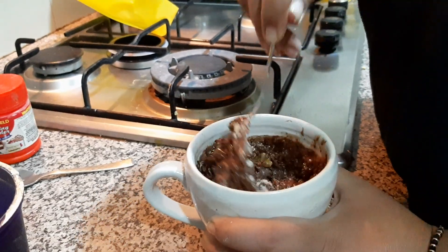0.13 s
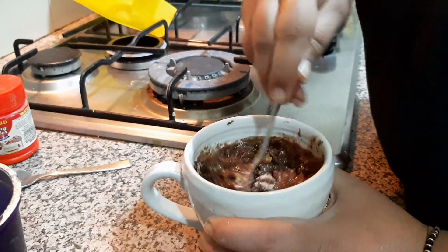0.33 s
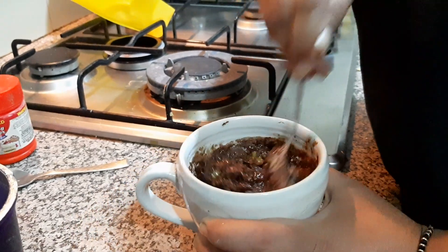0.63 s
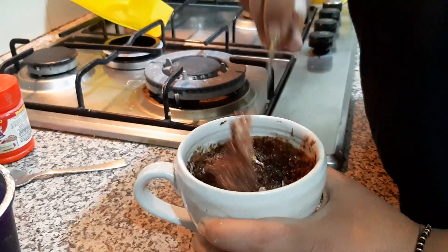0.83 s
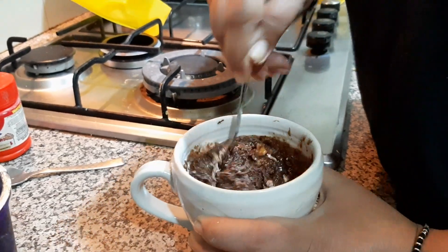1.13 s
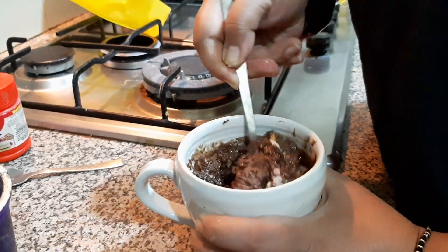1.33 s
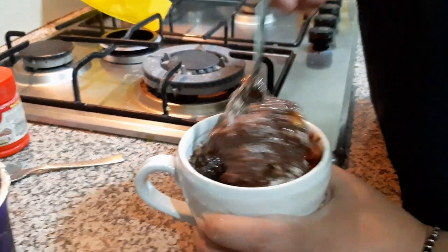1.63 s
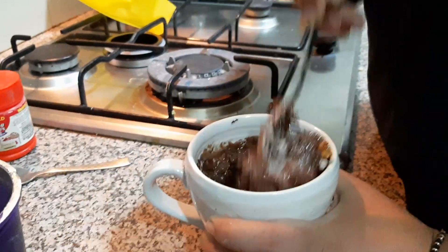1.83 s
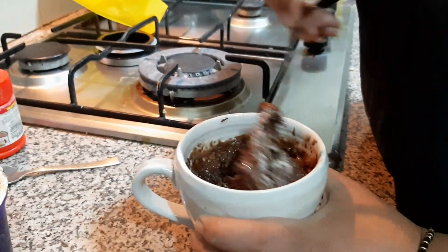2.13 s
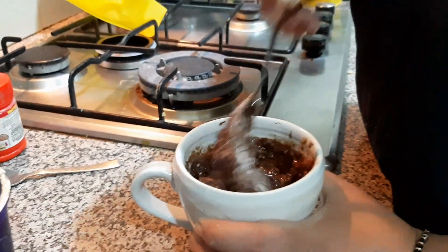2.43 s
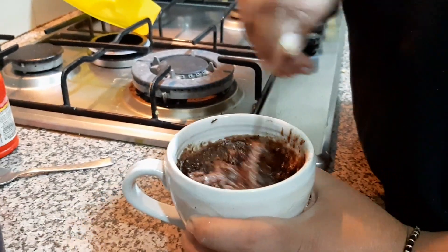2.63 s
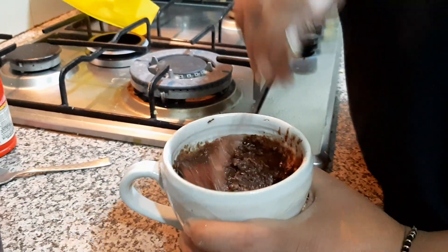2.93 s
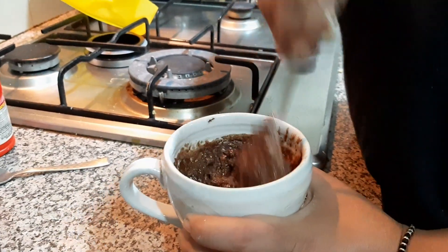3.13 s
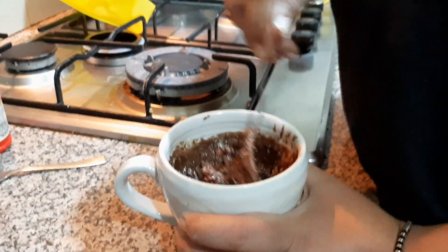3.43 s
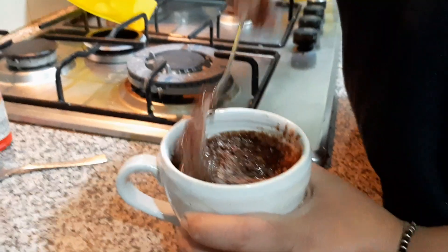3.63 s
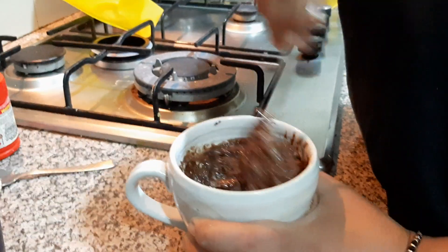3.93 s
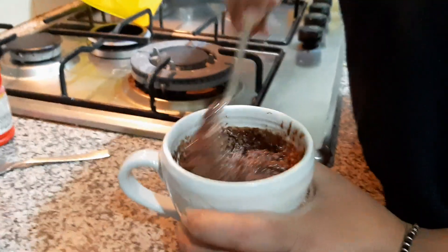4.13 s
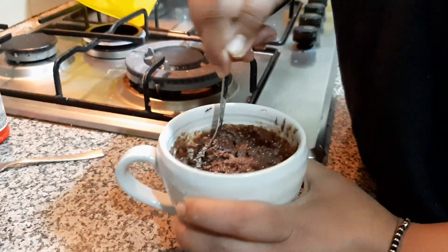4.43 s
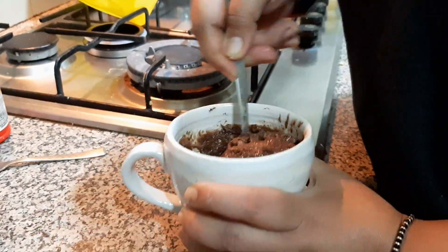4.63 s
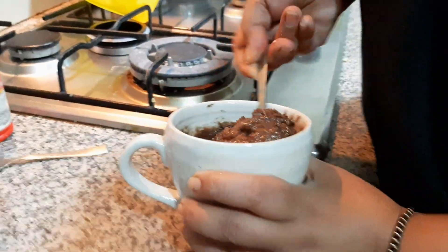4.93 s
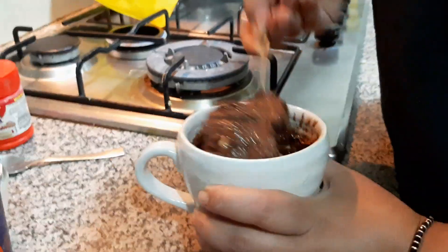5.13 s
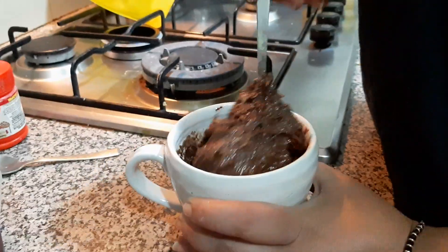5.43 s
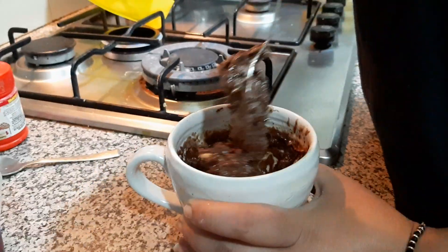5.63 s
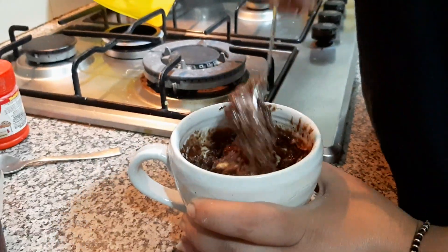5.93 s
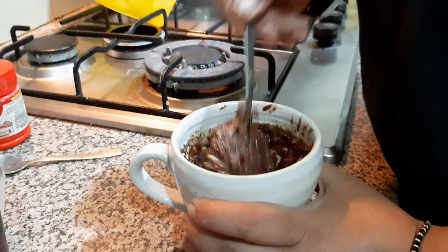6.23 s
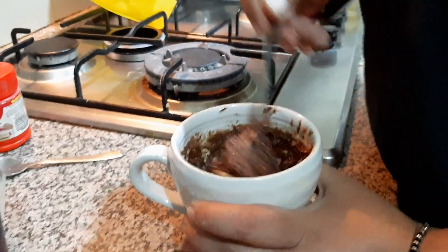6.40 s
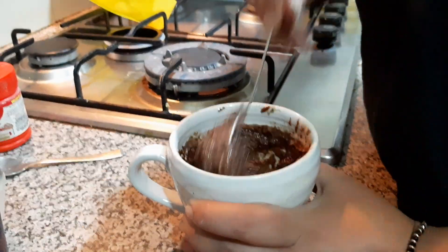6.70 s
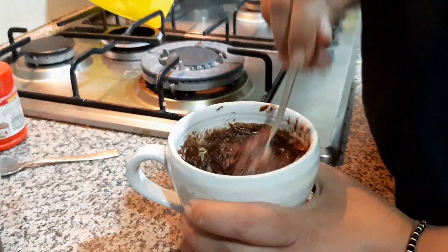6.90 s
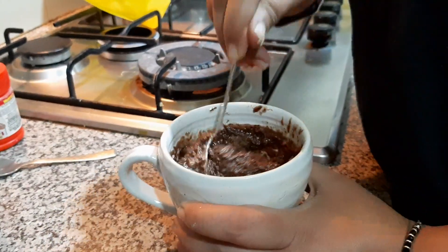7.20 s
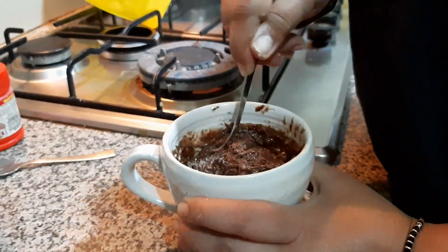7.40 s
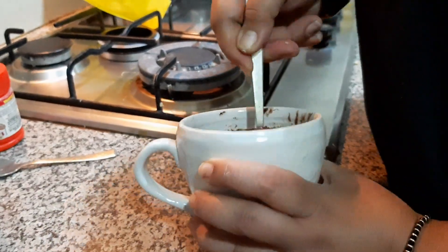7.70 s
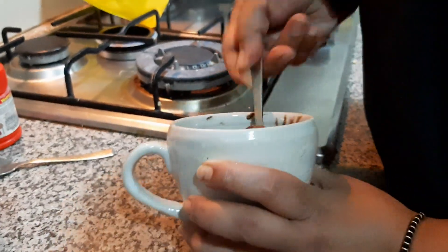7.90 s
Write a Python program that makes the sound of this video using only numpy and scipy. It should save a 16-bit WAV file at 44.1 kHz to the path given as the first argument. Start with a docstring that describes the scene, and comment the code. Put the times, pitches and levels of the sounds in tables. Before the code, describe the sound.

A metal spoon stirs thick batter in a ceramic mug, close to the microphone in a small kitchen. Short, damped clinks and hollow knocks come at uneven intervals, mixed with brief scrapes and the soft, wet smacking of the mixture. The knocks grow stronger around the middle, ease off while the sticky stirring continues, then bunch into a quick clatter near the end. A faint low hum lies underneath.

```python
"""A small, hard kitchen, with a stereo microphone close to a ceramic mug held on a stone worktop.
A metal spoon stirs thick batter: its knocks and stick-slip scrapes ring the mug and pop its hollow.
The batter smacks and crackles as sticky pockets burst, and swishes once as the spoon drags air through.
Near echoes and a short room tail answer, over the quiet hum of the kitchen."""
import sys
import numpy as np
from scipy import signal
from scipy.fft import rfft, irfft, next_fast_len
from scipy.io import wavfile

SR = 44100
rng = np.random.default_rng(int(sys.argv[2]) if len(sys.argv) > 2 else 0)


def waveform_to_disk(signal):
    """Save audio, clipped to [-1, 1], as 16-bit WAV at the path in sys.argv[1]."""
    frames = np.transpose(np.atleast_2d(signal))
    scaled = np.clip(frames, -1, 1) * 32767
    samples = np.round(scaled).astype(np.int16)
    wavfile.write(sys.argv[1], SR, samples)


N = 355357

# The spoon meets the mug. Each row: start in seconds, thud level in dB, then thump, wall ring and clink
# in dB relative to the thud, contact time in ms, then the favoured thud, wall and clink pitches in Hz.
SPOON_KNOCKS = [(0.152, -45.5, 7, 9.5, 7, 1.7, 580, 2800, 4170),
                (.164, -27, -20, -47, -35, 4.4, 933, 1730, 4140),
                (0.335, -45, -1, -2, 11, 2, 986.8, 3100, 5140),
                (.366, -37, -11, -11, -8, 5.2, 1010, 3060, 4400),
                (.573, -45.5, -22, -37, -8, 3.1, 1050, 2340, 4190),
                (.674, -28, -14, 6.5, 1.5, 18.6, 1053, 2480, 4000),
                (0.853, -15.5, -13, -11.5, -33, 5.1, 1023, 1400, 3840),
                (1.198, -30.5, -5, -9, -26.5, 13, 1060, 1440, 4560),
                (1.235, -28.5, -6, -15, -24, 3.627, 1100, 1480, 4540),
                (1.307, -30.5, -15, -2, -2, 3.2, 1190, 1631, 5110),
                (1.4, -37.5, -29.5, -1.5, 5, 5, 990, 2820, 4900),
                (1.91, -53.5, -23, -21, -15, 3.914, 1108, 1800, 4400),
                (2.483, -35.5, -10, -15, -30.5, 3, 1018, 1839, 5180),
                (2.572, -37.5, -15.5, 11, 16.5, 3.4, 1043, 2100, 5870),
                (2.6, -34.5, -34, 8.5, -1, 6, 1200, 2360, 5670),
                (2.764, -30.5, -11.5, -15, -12, 1.4, 1046, 1780, 5860),
                (2.981, -30.5, -21, -6, 5, 3.2, 800, 2135, 5500),
                (3.044, -6.5, -11, -1, -15.5, 7.3, 1112, 1796, 4450),
                (3.328, -28.5, -18, -14.5, -27, 1.4, 993, 1880, 3680),
                (4.177, -10.5, -7.5, -5, -20, 31, 1110, 1797, 4300),
                (4.309, -17.5, -9, -13.5, -44.5, 7.7, 1030, 1760, 4100),
                (4.513, -34, 2.5, -6, -5, 3.7, 613, 2140, 5170),
                (4.589, -28.5, -6, 8, 1, 6.4, 1110, 2970, 3670),
                (4.641, -14, -14, -4, 6.5, 2.35, 1126, 2020, 4440),
                (4.71, -20, -16, -5.5, 0, 4.4, 1190, 2010, 4700),
                (4.876, -29, -25, 9.5, 6, 5.7, 980, 2800, 4400),
                (4.899, -26.5, -15, 5, 10, 12, 926, 2100, 4500),
                (4.926, -39, -14, 2, 22, 1.3, 840, 1970, 4500),
                (5.368, -36, -22, -25, -40, 9.8, 1030, 1800, 4000),
                (5.384, -18.5, -18, -10, -40, 6.3, 1020, 1400, 3890),
                (6.13, -37, -9, 1.5, -1, 11, 592, 2060, 5160),
                (6.152, -26, -41, -2.5, -12.5, 5.3, 1135, 2125, 5193),
                (6.822, -28.5, -6.5, 1.5, 1, 6.2, 803, 2254, 5436),
                (6.99, -38, -7, -13, -7, 8.5, 604, 2872, 4700),
                (7.156, -48, -0.5, -27, -24, 3.7, 1049, 1790, 4375),
                (7.381, -41, -14, -3.5, -6, 6.2, 540, 2100, 5200),
                (7.405, -33.5, -18, -14, -22, 4.5, 1115, 2100, 4090),
                (7.521, -37, -14, -22, -10, 2.3, 1067, 1780, 4537),
                (7.493, -39.5, -5, -20, -20, 3, 640, 2100, 4600),
                (7.542, -33.5, -7, -16, -14, 2.3, 733, 1880, 4600),
                (7.606, -34.5, -1, -5, -16, 4.7, 704, 1710, 4750),
                (7.691, -28, -28, 2, -2, 7.4, 1134, 2010, 5120),
                (7.727, -20, -21, -18, -1, 3.2, 933, 2130, 4626),
                (7.769, -16.5, -31, -9.5, -5.5, 3.1, 931, 1870, 4230),
                (7.78, -27, -11, -2, -9, 3.4, 996, 1880, 4150),
                (7.792, -27, 3.5, -4, -12, 2.5, 960, 1874, 3980),
                (7.818, -43, 6, -9, 0, 3.8, 945, 1890, 4400),
                (7.875, -29.5, -17, -10.5, -15, 2.875, 930, 2109, 4400),
                (7.9, -31, -9, -19, -15, 6.8, 934, 2100, 4460),
                (7.974, -30.5, -14, 1.5, -4, 3.4, 870, 2100, 4540),
                (8.017, -32, -5, 10, 17.5, 2.45, 840, 2060, 5010)]
# The spoon slides along the wall. Each row: start and length in seconds, growth over the length in dB,
# closing levels of thud, thump, wall ring, clink and hollow in dB, starting pitch of the hollow in Hz.
SPOON_SCRAPES = [(.365, 0.24, -4.5, -62.5, -67, -70, -69, -71, 1030),
                 (1.17, 0.13, 9.5, -42.5, -47.5, -50.5, -54, -50, 1155),
                 (2.995, 0.04, 2.5, -42, -42.5, -45, -68, -59, 979.1),
                 (4.46, 0.17, 3, -51, -49, -62, -57, -54, 1044),
                 (4.668, 0.12, -1, -50, -50, -67, -67, -45, 1070),
                 (4.8, 0.099, 11.5, -37, -48.5, -35, -40.5, -33, 938),
                 (4.97, 0.083, -2, -58.5, -58.5, -69, -57.5, -60, 857),
                 (5.31, 0.084, 8, -53, -50, -66, -62, -68.5, 1047),
                 (6.132, 0.057, -2.5, -70, -61.5, -65, -59, -64, 1090),
                 (7.384, 0.054, -4, -66, -56.5, -67, -70, -69, 1107),
                 (7.49, 0.12, 7, -49, -47.5, -53.5, -59, -68, 1040),
                 (7.651, 0.063, 0, -53.5, -48.5, -50, -55, -49, 1097),
                 (7.745, 0.14, -4.5, -49.5, -49, -54, -54, -40.5, 968),
                 (7.9, 0.094, 3.5, -50, -58, -47, -55, -42.5, 927)]
# Mug and spoon, damped by batter and hand. Each row: pitch in Hz, gain in dB, t60 in seconds.
MUG_MODES = [(230, -7, 0.013), (356, 22.5, 0.032), (484.28, 3.5, 0.059), (629, -2, 0.049), (790, -3, 0.046),
             (980, 15, 0.0073), (1030, 2, 0.019), (1147, 6.5, 0.015), (1560, -17.5, 0.066),
             (1850, 3, 0.022), (2106, 10.5, 0.019), (2386, 6.5, 0.02), (2610, 4, 0.035), (2803, 6.5, 0.027),
             (3140, 0, 0.024), (4100, -15, 0.018), (4244, -11, 0.028), (4490, -10, 0.025),
             (4630, -10.5, 0.011), (5135, 3, 0.0074), (5870, -2, 0.0067), (6795.8, -1.5, 0.0048),
             (7340, -3.5, 0.01), (9000, -10.5, 0.0026), (10580, -14.5, 0.0028)]
# The mode families thud, thump, wall ring and clink. Each row: lower and upper edge in Hz.
FAMILY_EDGES = [(500, 1400), (215, 500), (1400, 3500), (3500, 14000)]
# The three tones of the hollow's pop. Each row: ratio to the thud pitch, level in dB.
HOLLOW_TONES = [(.66, -7), (1.002, 1), (1.2, -6.5)]
# The batter lets go with a smack. Each row: start in seconds, level in dB, centre pitch in Hz.
BATTER_SMACKS = [(0.0301, -23.5, 6570), (0.0757, -22, 9800), (0.088, -25, 4180), (0.128, -30, 4440),
                 (0.29, -41.5, 4700), (0.336, -25.5, 3300), (0.4842, -34, 3040), (0.788, -37, 3120),
                 (.8447, -34, 2280), (0.954, -33.5, 4540), (1.1207, -26.5, 4440), (1.148, -28.5, 2365),
                 (1.3704, -29.5, 4250), (1.4615, -28.5, 4800), (1.652, -43, 7000), (1.6924, -41.5, 8200),
                 (1.821, -44, 4900), (1.845, -54, 4480), (1.9077, -38, 7400), (1.919, -38, 4040),
                 (1.942, -32, 5570), (1.957, -26.5, 5750), (1.9862, -35, 5650), (2.055, -30, 6130),
                 (2.073, -36.5, 5630), (2.107, -36, 7700), (2.2022, -45, 8050), (2.2672, -32, 6300),
                 (2.338, -44, 5300), (2.36, -25.5, 4040), (2.4218, -29.5, 5660), (2.439, -33, 5630),
                 (2.461, -29.5, 6900), (3.387, -36.5, 6900), (3.4313, -39, 6170), (3.436, -40, 7130),
                 (3.4628, -39, 7480), (3.542, -45.5, 2101), (3.6773, -49, 4890), (3.693, -40, 7100),
                 (3.7781, -35.5, 7400), (3.795, -36, 5140), (3.807, -29.5, 7060), (3.813, -41.5, 4800),
                 (3.82, -37.5, 7420), (3.855, -42, 5070), (3.9172, -33, 6675), (3.9409, -34, 7000),
                 (4.048, -36.5, 5500), (4.103, -32, 4700), (4.1178, -38, 4430), (4.354, -29.5, 4650),
                 (4.374, -36, 4370), (4.569, -27, 2840), (5.3402, -39, 4160), (5.55, -36, 4760),
                 (5.942, -39, 4730), (5.9595, -45.5, 4430), (6.186, -37, 4060), (6.265, -53, 2776),
                 (6.2925, -34, 6093), (6.3031, -23.5, 5500), (6.324, -38, 4800), (6.3887, -43.5, 5670),
                 (6.4312, -33, 5690), (6.5124, -36.5, 6060), (6.589, -27.5, 6320), (6.967, -37.5, 5450),
                 (7.004, -34.5, 3680), (7.069, -47, 4930), (7.204, -39, 7800)]
# Each fold of the batter crackles wetly. Each row: start and length in seconds, level in dB,
# pocket pitch in Hz, level of the treble fizz in dB.
BATTER_FOLDS = [(0, 0.021, -61, 7140, -81), (0.079, .07, -59, 4270, -58),
                (0.431, 0.089, -59.5, 4750, -65.5), (0.701, 0.22, -60, 4180, -68.5),
                (0.998, 0.09, -63, 4460, -83), (1.19, 0.16, -51.5, 5250, -65),
                (1.459, 0.074, -56, 4700, -62), (1.646, 0.078, -69, 5600, -68),
                (1.838, 0.18, -64, 5300, -82), (2.037, 0.077, -64, 5800, -64.5),
                (2.279, 0.18, -63, 5430, -63.5), (2.59, 0.17, -62, 5150, -64),
                (3.039, 0.081, -48, 4245, -58), (3.198, 0.027, -59.5, 4660, -63),
                (3.377, 0.086, -64, 6200, -75), (3.526, 0.037, -68, 5000, -69.5),
                (3.798, .08, -58, 6980, -61.5), (3.92, 0.21, -64.5, 4525, -67.5),
                (4.204, 0.22, -59, 4580, -70), (4.547, 0.18, -51, 4650, -59.5),
                (4.843, 0.073, -42.5, 4440, -58), (5.031, .3, -61, 4500, -72),
                (5.481, 0.096, -62.5, 5030, -71.5), (5.821, 0.033, -65.5, 4900, -77),
                (5.951, 0.09, -63, 4630, -68.5), (6.143, 0.036, -63.5, 4800, -66),
                (6.289, 0.05893, -61.5, 5380, -60.5), (6.426, 0.05, -67, 5170, -71),
                (6.587, .08, -66.5, 5850, -62.5), (6.756, .14, -63, 5080, -81.5),
                (6.966, 0.085, -58, 4770, -61.5), (7.371, .06, -67, 4680, -82.5),
                (7.555, 0.086, -55, 5420, -78), (7.695, 0.12, -54.5, 4337, -67),
                (7.939, 0.072, -51.5, 4980, -73)]
# The colour of the crackle. Each row: frequency in Hz, gain in dB.
CRACKLE_SPECTRUM = [(1180, -21.5), (2000, -5), (2730, -0.5), (3270, -7), (3700, 1), (5990, 1), (10000, -21),
                    (13000, -23), (22000, -120)]
# The course of the falling swish. Each row: time in seconds, level in dB, pitch in Hz.
SWISH_PATH = [(0.369, -66, 2940), (.42, -47.5, 2740), (.52, -68.5, 2500), (.67, -53.5, 2450)]
# Direct sound at the microphone. Each row: frequency in Hz, lag of right behind left in radians.
RIGHT_LAG = [(100, 1), (500, 0.07), (1100, 1.4), (2200, 6), (4000, 5.2), (16000, 9.7)]
# The colour of the near echoes. Each row: frequency in Hz, gain in dB.
ECHO_SPECTRUM = [(200, -18), (700, -13.5), (1300, -2), (2500, 0.5), (6000, 0.5), (16000, 3.5)]
# The room's decay. Each row: frequency in Hz, t60 in seconds before the tail's extra damping.
ROOM_DECAY = [(150, 0.46), (500, 0.45), (1200, 0.49), (2500, 0.47), (5000, 0.27), (12000, 0.15)]
# The diffuse field at the microphone. Each row: frequency in Hz, left-right likeness from 0 to 1.
STEREO_LIKENESS = [(60, 0.82), (300, 0.96), (640, 0.65), (1400, 0.13), (16000, 0.078)]
# The colour of the kitchen's hum. Each row: frequency in Hz, relative level in dB.
HUM_SPECTRUM = [(20, -39.5), (40, -52), (65, 9), (100, -10), (250, -3.5), (450, -9), (700, -14.5),
                (1100, -19.5), (1700, -30), (3000, -33), (5000, -24.5), (8000, -31.5), (16000, -39.5)]


def knocks():
    """The spoon chatters briefly on the mug. Returns the ring of the wall and the pop of the hollow."""
    rise_ms, slump_ms = 2, 16.4
    pop_ms, pop_sag_hz_per_s = 12.7, 6800
    bump_hz, bump_db, bump_t60 = 125, -31.5, .15  # the worktop takes the blow
    wall, hollow = np.zeros((2, N))
    t = np.arange(4000) / SR
    ms = 1000 * t
    stilling = np.exp(-(ms / slump_ms) ** 2)  # the batter slumps back and stills the wall
    for start, thud_db, thump_db, wall_db, clink_db, contact_ms, *spot_hz in SPOON_KNOCKS:
        age = ms / max(contact_ms, .5)
        force = flatten(rng.standard_normal(len(t)) * np.exp(-age), share=0.84)
        force *= np.minimum(ms / rise_ms + 0.13, 1) * np.exp(-(age / 3.9) ** 2)
        # each spot on the mug favours the modes near its three pitches
        spot_db = lambda hz: 12 * np.exp(-(np.log(hz / np.array(spot_hz)) / 0.054) ** 2).max()
        for edges_hz, db in zip(FAMILY_EDGES, (0, thump_db, wall_db, clink_db)):
            dulling = np.exp(-age * edges_hz[0] / 61000)  # higher families are driven more briefly
            ring = mug_ring(force * dulling, edges_hz, spot_db)
            add(wall, start, gain_of(thud_db + db) * ring / abs(ring).max() * stilling)
        cycles = np.cumsum(spot_hz[0] - pop_sag_hz_per_s * (ms - pop_ms / 2) / 1000) / SR
        tones = sum(gain_of(db) * np.sin(2 * np.pi * (ratio * cycles + rng.random()))
                    for ratio, db in HOLLOW_TONES)
        pop = 0.3132 * tones * np.minimum(ms / 2.6, 1) * np.exp(-(ms / pop_ms) ** 4)
        pop_db = thud_db - 0.27 * np.clip(wall_db + 5.5, -14, 14)  # a duller contact pops more
        bump = gain_of(thud_db + bump_db - 60 * t / bump_t60) * np.sin(2 * np.pi * bump_hz * t)
        add(hollow, start, gain_of(pop_db) * pop + bump)
    return wall, hollow


def scrapes():
    """The spoon edge sticks and slips over the glaze: clumps of clicks ring the mug and its hollow."""
    sag_hz_per_s = 300
    out = np.zeros(N)
    for start, length, growth_db, *levels_db, start_hz in SPOON_SCRAPES:
        t = np.arange(start - .05, start + length + .15, 1 / SR)
        slips_db = 5.5 * unit_rms(mode(rng.standard_normal(len(t)), hz=60.4, t60=0.04))
        clicks = grit(len(t), per_s=2500, spread_db=3.5)
        force = clicks * gain_of(np.clip(slips_db, -14, 8))
        rings = [mug_ring(force, edges, lambda hz: 2.1 * rng.standard_normal()) for edges in FAMILY_EDGES]
        hollow_hz = start_hz - sag_hz_per_s * (t - start)
        rings.append(gliding_mode(gliding_mode(clicks, hollow_hz, t60=0.045), hollow_hz, t60=0.015))
        sound = sum(gain_of(db) * unit_rms(ring) for db, ring in zip(levels_db, rings))
        ramp_db = growth_db * (np.clip((t - start) / length, 0, 1) - 1)
        fade_db = swell_db(t, start, length, rise_db_per_s=897, fall_db_per_s=306)
        add(out, t[0], sound * gain_of(ramp_db + fade_db))
    return out


def mug_ring(force, edges_hz, spot_db):
    """A force rings one family of modes; spot_db(Hz) says how well the struck spot reaches each."""
    low, high = edges_hz
    ring = sum(gain_of(db + spot_db(hz)) * mode(force, hz, t60)
               for hz, db, t60 in MUG_MODES if low <= hz < high)
    # a small body radiates little outside its modes
    return butter(ring, 4, (0.81 * low, 1.44 * high), "band")


def smacks():
    """Four sticky pockets burst almost together, each a few dying cycles, with a broad snap on top."""
    spacing_s, detune, decay_cycles, snap_db = 0.0025, 0.16, 1.4, -20.5
    out, t = np.zeros(N), np.arange(600) / SR
    for (start, db, centre_hz), pockets in zip(BATTER_SMACKS, rng.random((len(BATTER_SMACKS), 4, 2))):
        for k, (jitter, pitch) in enumerate(pockets):
            hz = centre_hz * (1 + detune * (2 * pitch - 1))
            envelope = np.exp(-t * hz / decay_cycles) * (1 - np.exp(-t * hz / 0.51))
            pocket = np.sin(2 * np.pi * hz * t) * envelope
            delay = max(k - jitter, 0) * spacing_s
            add(out, start + delay, gain_of(db - 7.2 * k) * pocket / abs(pocket).max())
        snap = np.diff(rng.standard_normal(len(t) + 1)) * np.exp(-t / 0.0011)
        add(out, start, gain_of(db + snap_db) * snap)
    return out


def crackle():
    """Countless tiny pockets pop in clumps as the batter folds; the loudest fold leads their pitch."""
    t, steps = np.arange(N) / SR, np.arange(0, N / SR, .004)
    start, length, db, hz, fizz_db = np.transpose(BATTER_FOLDS)[:, :, None]
    power = gain_of(db + swell_db(steps, start, length, rise_db_per_s=280, fall_db_per_s=199)) ** 2
    fizz_swell_db = swell_db(steps, start, length, rise_db_per_s=298.5, fall_db_per_s=198)
    fizz_power = gain_of(fizz_db + fizz_swell_db) ** 2
    level = np.interp(t, steps, np.sqrt(power.sum(0)))
    fizz_level = np.interp(t, steps, np.sqrt(fizz_power.sum(0)))
    pocket_hz = np.interp(t, steps, (power * hz).sum(0) / power.sum(0))
    pops = grit(N, per_s=900, spread_db=4.8) + 0.45 * rng.standard_normal(N)
    clumps = unit_rms(mode(rng.standard_normal(N), hz=29.83, t60=0.07))
    pops *= gain_of(3 * np.clip(clumps, -2, 2))
    size = next_fast_len(N)
    colour = gain_of(curve_at(CRACKLE_SPECTRUM, np.fft.rfftfreq(size, 1 / SR)))
    broad = irfft(rfft(pops, size) * colour, size)[:N]
    pockets = unit_rms(broad) + 0.5 * unit_rms(gliding_mode(broad, pocket_hz, t60=0.004))
    fizz = butter(pops, 2, (7500, 15500), "band")
    return (unit_rms(pockets) + gain_of(-4) * ticks()) * level + unit_rms(fizz) * fizz_level


def ticks(per_s=190, low_hz=3000, high_hz=10000, decay_cycles=1.25):
    """Small sticky pockets of many sizes snap at random, each a few cycles at its own pitch."""
    out, t = np.zeros(N), np.arange(200) / SR
    for when, rank, pitch in rng.random((int(per_s * N / SR), 3)):
        hz = low_hz * (high_hz / low_hz) ** pitch
        pocket = np.sin(2 * np.pi * hz * t) * (t * hz) * np.exp(-t * hz / decay_cycles)
        strength = gain_of(-4 * np.log(rank + .015)) * np.sqrt(hz / SR)
        add(out, when * N / SR, strength * pocket)
    return unit_rms(out)


def swish():
    """The spoon drags air through the batter: noise in a pocket whose pitch falls."""
    times, db, hz = np.transpose(SWISH_PATH)
    out, t = np.zeros(N), np.arange(times[0], times[-1], 1 / SR)
    pocket_hz = np.interp(t, times, hz)
    air = gliding_mode(rng.standard_normal(len(t)), pocket_hz, t60=0.0041)
    air = gliding_mode(air, pocket_hz, t60=0.0034)
    envelope = gain_of(np.interp(t, times, db)) * signal.windows.tukey(len(t), .2)
    add(out, times[0], unit_rms(air) * envelope)
    return out


def kitchen(direct, into_room, count=3):
    """The near echoes stay put; the room crossfades steadily between tails, so no pitch keeps ringing."""
    turn = np.pi * 2.3 * np.arange(N) / SR
    nears, tails = zip(*[(near_echoes(), room_tail()) for _ in range(count)])
    out = signal.oaconvolve(direct, nears[0], axes=1)[:, :N]
    for k, tail in enumerate(tails):
        share = np.sqrt(2 / count) * np.cos(turn + np.pi * k / count)
        out += signal.oaconvolve(into_room * share, tail, axes=1)[:, :N]
    return out


def near_echoes():
    """The short way to the microphone: direct sound and a dense spray off mug, worktop and hob."""
    spray = diffuse_noise(lambda hz, t: 1, frames=36, size=256)[:, 256:2304]
    t, hz = np.arange(spray.shape[1]) / SR, np.fft.rfftfreq(spray.shape[1], 1 / SR)
    spray = flatten(spray * np.exp(-t / 0.00082), share=1)
    spray /= np.linalg.norm(spray, axis=1, keepdims=True)
    direct = np.exp(-1j * np.array([0 * hz, curve_at(RIGHT_LAG, hz)]))
    spectrum = direct + rfft(spray) * gain_of(curve_at(ECHO_SPECTRUM, hz))
    near = flatten(irfft(spectrum), share=0.79)
    near[:, 1024:] = 0
    return near / np.linalg.norm(near, axis=1, keepdims=True)


def room_tail(build_s=0.002, damping_db_per_s=30):
    """Reflections from farther off build up quickly and die away, the treble first."""
    tail = diffuse_noise(lambda hz, t: gain_of(-60 * t / curve_at(ROOM_DECAY, hz)), frames=500, size=256)
    t = np.arange(tail.shape[1]) / SR
    tail = flatten(tail, share=0.2) * gain_of(-damping_db_per_s * t)
    tail *= 1 - np.exp(-t / build_s)
    return tail / np.linalg.norm(tail[0])


def hum():
    """The steady low hush of the kitchen, all round the microphone."""
    hush = diffuse_noise(lambda hz, t: gain_of(curve_at(HUM_SPECTRUM, hz)), N // 256 + 5, size=1024)
    return gain_of(-59) * unit_rms(hush[:, :N])


def diffuse_noise(colour, frames, size):
    """Two-channel noise, alike in the bass and unlike in the treble; colour maps (Hz, s) to gain."""
    hz, t = np.fft.rfftfreq(size, 1 / SR)[:, None], np.arange(frames) * size / 4 / SR
    a, b, c, d = rng.standard_normal((4, len(hz), frames))
    likeness = np.clip(curve_at(STEREO_LIKENESS, hz), 0, 1)
    left = a + 1j * b
    right = likeness * left + np.sqrt(1 - likeness ** 2) * (c + 1j * d)
    return signal.istft(np.array([left, right]) * colour(hz, t), nperseg=size, noverlap=size * 3 // 4)[1]


def mode(x, hz, t60):
    """A mode of fixed pitch, driven by x."""
    decay, turn = np.exp(-np.log(1000) / (t60 * SR)), 2 * np.pi * hz / SR
    return signal.lfilter([0, decay * np.sin(turn)], [1, -2 * decay * np.cos(turn), decay ** 2], x)


def gliding_mode(x, hz, t60):
    """A mode driven by x, its pitch following the curve hz."""
    turn = np.exp(2j * np.pi * np.cumsum(hz) / SR)
    decay = np.exp(-np.log(1000) / (t60 * SR))
    return (turn * signal.lfilter([1], [1, -decay], x / turn)).imag


def grit(count, per_s, spread_db):
    """Sparse clicks of random sign, a few of them large."""
    chance, side, rank = rng.random((3, count))
    return (chance < per_s / SR) * np.sign(side - .5) * gain_of(-spread_db * np.log(rank + 0.0018))


def swell_db(t, start, length, rise_db_per_s, fall_db_per_s):
    """Rises to 0 dB, holds for the length, then falls."""
    return -rise_db_per_s * np.maximum(start - t, 0) - fall_db_per_s * np.maximum(t - start - length, 0)


def flatten(x, share):
    """Keeps the phase of x but evens out a share of the peaks and dips in its spectrum."""
    spectrum = rfft(x)
    return irfft(spectrum / (abs(spectrum) + 1e-9) ** share, x.shape[-1])


def butter(x, order, hz, kind):
    """Filters x with a flat passband."""
    return signal.sosfilt(signal.butter(order, hz, kind, fs=SR, output="sos"), x)


def curve_at(points, hz):
    """Reads a table on a log-frequency axis."""
    points_hz, values = np.transpose(points)
    return np.interp(np.log(hz + 1), np.log(points_hz + 1), values)


def add(mix, start, sound):
    """Mixes a sound in at start seconds."""
    part = mix[round(start * SR):][:len(sound)]
    part += sound[:len(part)]


def gain_of(db):
    """Decibels to amplitude."""
    return 10 ** (np.asarray(db) / 20)


def unit_rms(x):
    """Scales to rms 1."""
    return x / np.sqrt(np.mean(x ** 2) + 1e-20)


def scene():
    """The wall sounds all round; hollow and batter face the microphone, shielded by mug and hand."""
    wall, hollow = knocks()
    mug = (wall + scrapes())[None]
    smacking = smacks()
    batter = swish() + crackle() * gain_of([[-1.5], [1.5]])  # the crackle sits a little to the right
    direct = gain_of(1) * (mug + hollow + batter + smacking)
    into_room = gain_of(-4) * mug + gain_of(-14.5) * hollow + gain_of(-5) * batter + gain_of(-8) * smacking
    return kitchen(direct, into_room) + hum()


def record(dry):
    """The microphone's low cut; a slight pan left, and slightly right in the treble; the band limit."""
    low_cut = butter(dry, 3, 52, "high")
    treble = butter(low_cut, 2, (3000, 10000), "band")
    panned = low_cut * gain_of([[.7], [-.7]]) + treble * np.array([[-.1], [.1]])
    band_limit = signal.firwin(511, 15900, window=("kaiser", 9), fs=SR)
    return signal.oaconvolve(panned, band_limit[None], "same")


dry = scene()
out = record(dry)
waveform_to_disk(out)
```